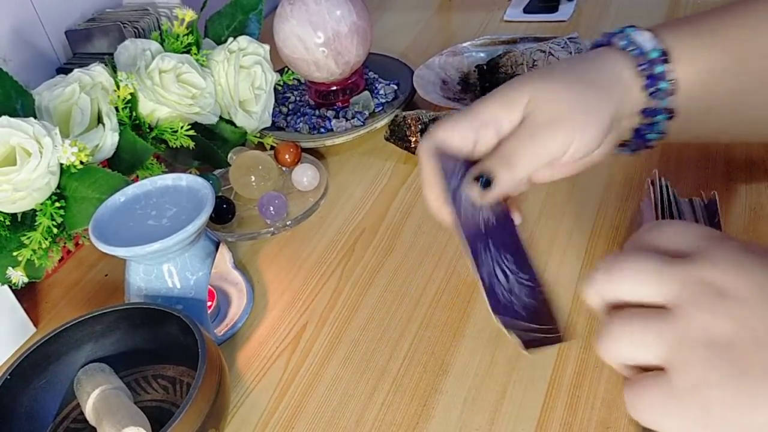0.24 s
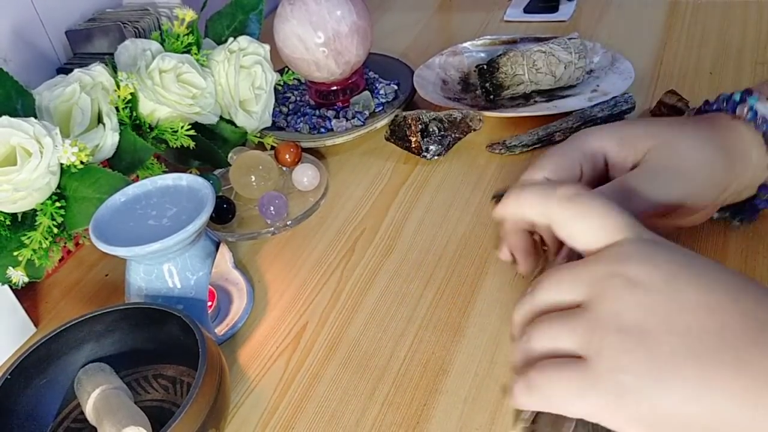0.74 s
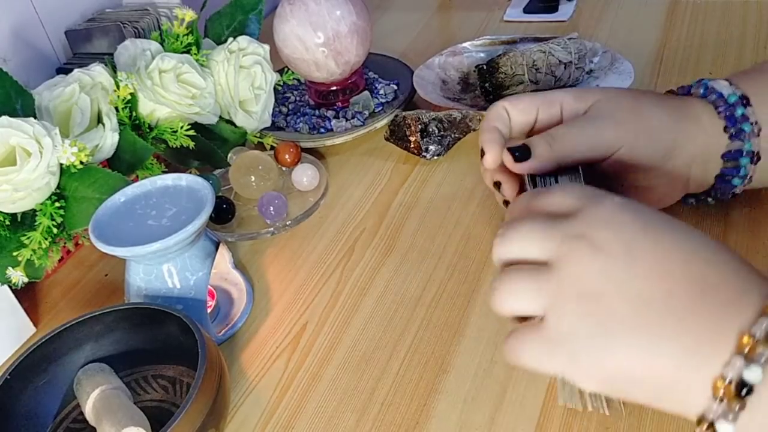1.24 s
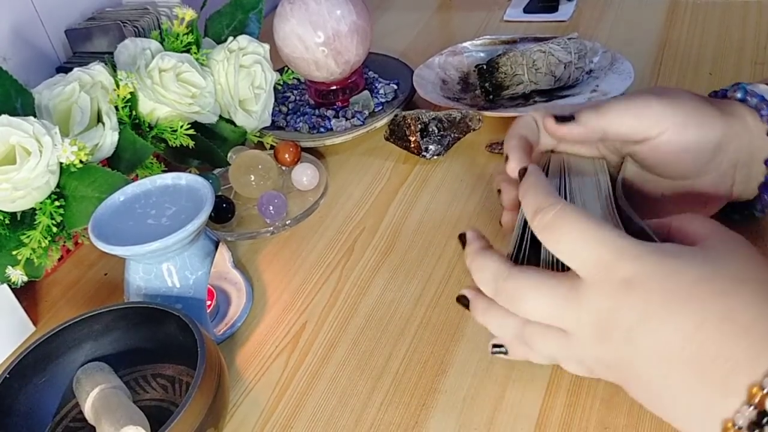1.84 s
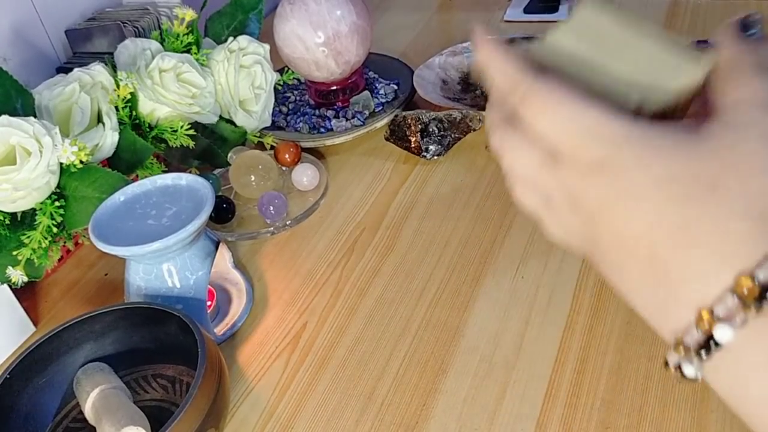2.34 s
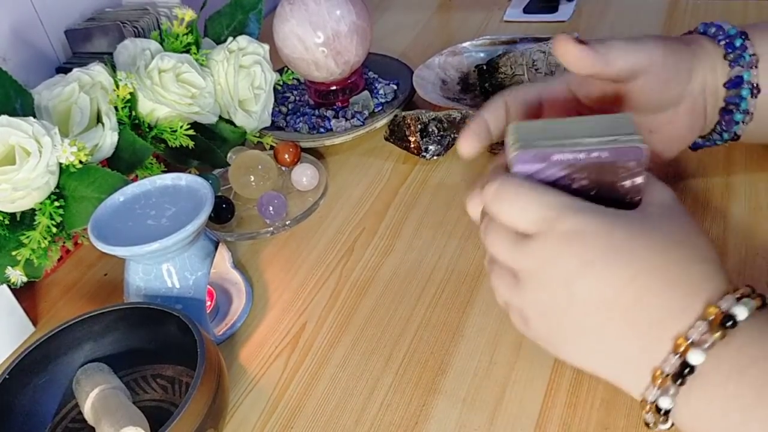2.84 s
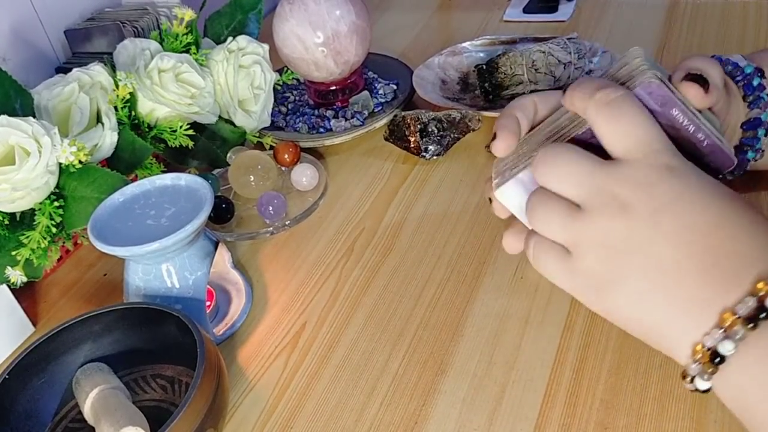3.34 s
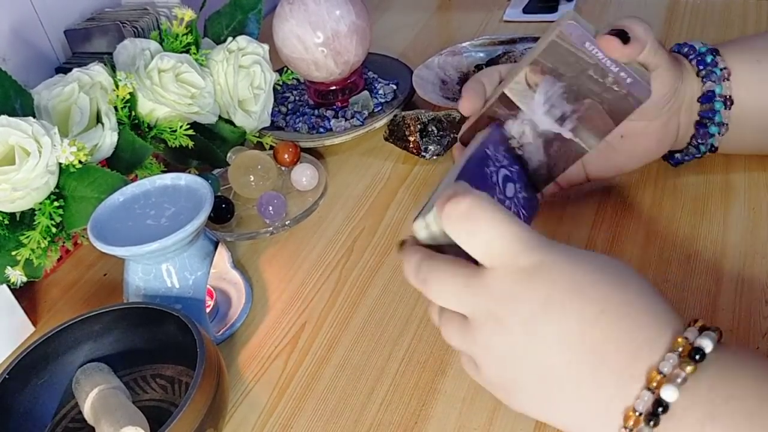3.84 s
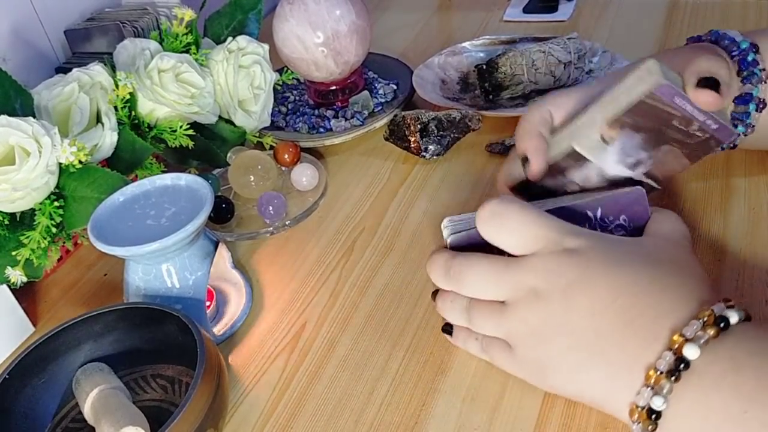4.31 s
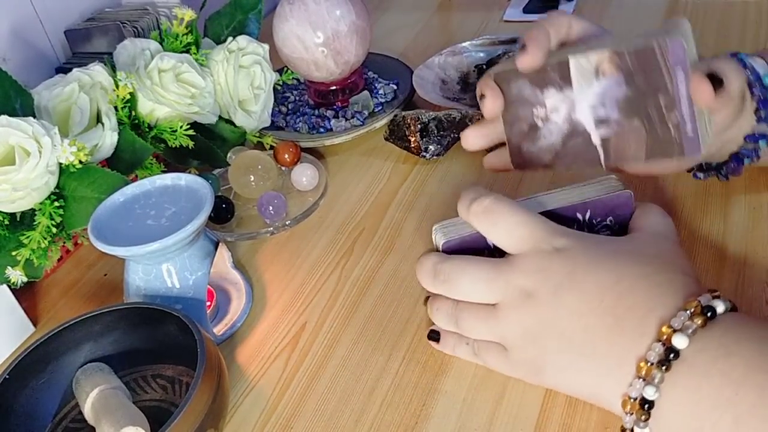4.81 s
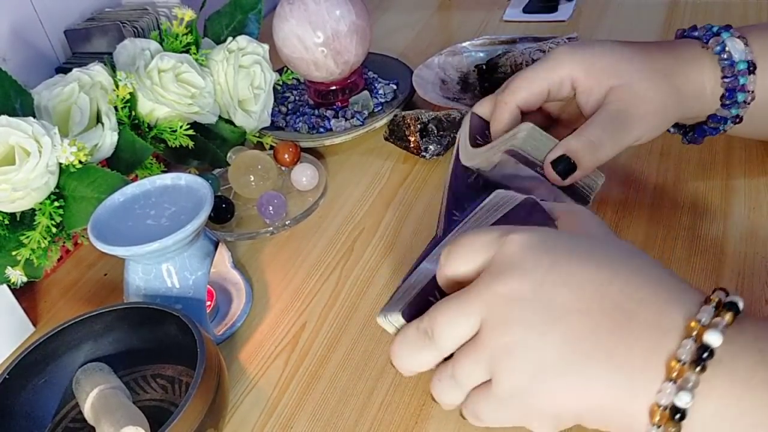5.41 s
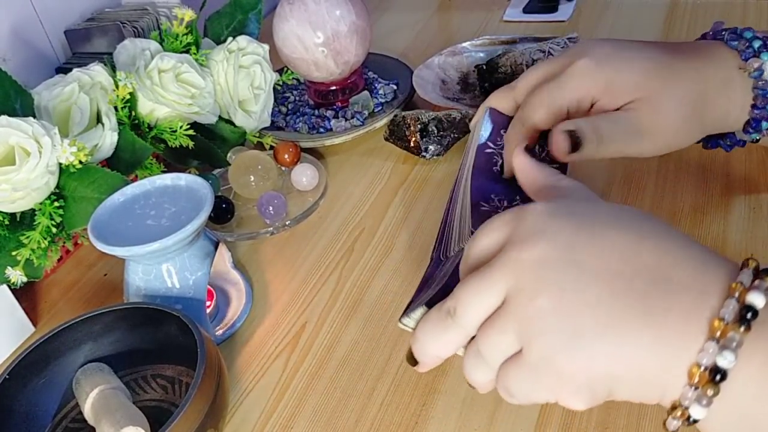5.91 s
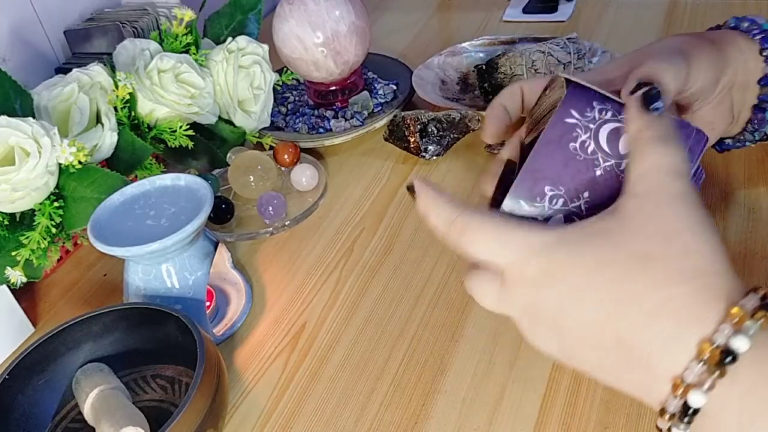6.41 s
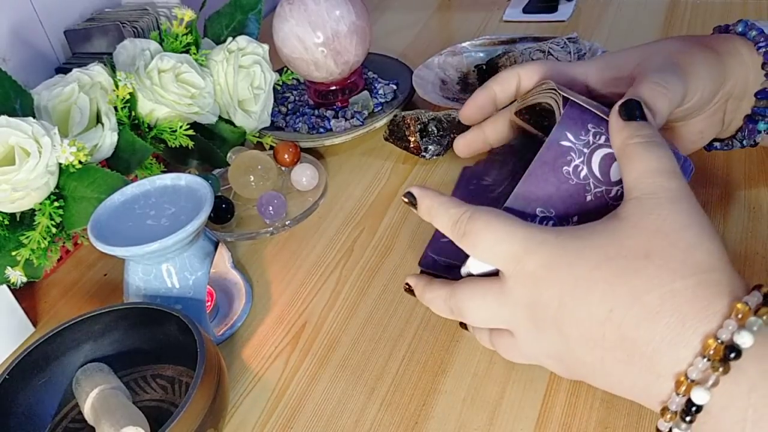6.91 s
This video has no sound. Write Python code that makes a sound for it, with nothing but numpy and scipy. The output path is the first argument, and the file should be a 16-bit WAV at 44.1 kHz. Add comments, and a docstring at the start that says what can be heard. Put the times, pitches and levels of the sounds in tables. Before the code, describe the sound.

Faint card rustles and ticks, sharp deck clacks on wood, then a swelling riffle of crisp snaps and a softer fluttering bridge, close in a small room.

```python
"""A fan's wavering hum and rush of air, then the faint rustle and first snaps of a deck of large cards.
The deck is knocked square on a wooden table, cut in two, riffled and bent into a bridge.
Knocks are clacks of card edges over table thuds; flicks are ringing edge snaps plus slaps on the pile.
Rubbing faces are uneven catches in noise. Short blurred tails follow the sounds; the band is narrow.
"""
import sys
import numpy as np
from scipy import signal
from scipy.fft import rfft, irfft, next_fast_len
from scipy.io import wavfile
from scipy.ndimage import uniform_filter1d

SR = 44100
rng = np.random.default_rng(int(sys.argv[2]) if len(sys.argv) > 2 else 0)


def wrap_up_sound(samples):
    """Save the sound to the file named by the first command line argument, as 16-bit audio."""
    columns = np.atleast_2d(samples).T
    # keep every value between -1 and 1, then stretch to whole-number steps
    tamed = np.clip(columns, -1, 1)
    steps = np.round(tamed * 32767).astype(np.int16)
    wavfile.write(sys.argv[1], SR, steps)


N = 315664  # samples


def undb(db):
    """Decibels to amplitude gain."""
    return 10 ** (np.asarray(db) / 20)


def curve(table):
    """Columns of a timed table, joined by straight lines, one value per sample."""
    s, *columns = np.transpose(table)
    t = np.arange(N) / SR
    return [np.interp(t, s, column) for column in columns]


def unit(x):
    """Scale to rms 1."""
    return x / np.sqrt(np.mean(x ** 2))


def walk(rate_hz):
    """Slow random drift of rms 1: random steps at rate_hz, smoothed twice."""
    step_len = int(SR / rate_hz)
    steps = np.repeat(rng.standard_normal(N // step_len + 1), step_len)
    smooth = uniform_filter1d(uniform_filter1d(steps, step_len), step_len)
    return unit(smooth[:N])


def colour(x, points, extra_db=lambda hz: 0):
    """Minimum-phase filter through (Hz, dB) points, plus an optional dB function of frequency."""
    size = next_fast_len(len(x), real=True) * 2
    hz = np.maximum(np.fft.rfftfreq(size, 1 / SR), 1)
    point_hz, point_db = np.transpose(points)
    gain_db = np.interp(np.log(hz), np.log(point_hz), point_db) + extra_db(hz)
    # folding the cepstrum makes the filter causal
    cepstrum = irfft(np.log(undb(gain_db)))
    cepstrum[1:size // 2] *= 2
    cepstrum[size // 2 + 1:] = 0
    response = np.exp(rfft(cepstrum))
    return irfft(rfft(x, size) * response)[:len(x)]


def contact(ms, points, extra_db=lambda hz: 0, first=0, size=2048):
    """A first touch and a dying chatter of tiny ones; energy of one millisecond at rms 1."""
    t_ms = np.arange(size) * 1000 / SR
    chatter = rng.standard_normal(size) * np.exp(-(t_ms / (1.29 * ms)) ** 2)
    chatter[0] += first * np.linalg.norm(chatter)
    # so many touches favour no pitch: flatten the spectrum, let the filter give the colour
    flat = irfft(np.exp(1j * np.angle(rfft(chatter))))
    burst = colour(flat * np.exp(-(t_ms / (2.5 * ms)) ** 2), points, extra_db)
    return burst / np.linalg.norm(burst) * np.sqrt(SR / 1000)


def add(track, s, sound):
    """Mix a sound in at s seconds."""
    i = int(s * SR)
    track[i:i + len(sound)] += sound[:N - i]


# Background level. Each row: time in seconds, level in dB before the gains.
BACKGROUND_LEVEL = [(0, -68), (1.0, -65.5), (1.9, -62.5), (2.4, -71.5), (3.15, -65), (3.5, -67.5),
                    (4.3, -65), (5.4, -69), (5.7, -58.5), (6.2, -65), (6.5, -67.5), (7.15, -56)]
# Spectrum of the moving air. Each row: frequency in Hz, relative level in dB.
AIR_SPECTRUM = [(20, -55), (40, -28.5), (53, -16.5), (90, -20), (118, -12), (160, -11), (205, -15),
                (250, -13), (330, -9), (365, -11.5), (420, -16), (720, -14.5), (1000, -21), (7800, -32)]
# Fan tones. Each row: mean frequency in Hz, level in dB rms before flutter, level curve and hum_db.
FAN_TONES = [(118.4, -73), (183.0, -81), (242.2, -76.5), (360.7, -68.5)]


def fan(air_gain_db=0.97, hum_db=1.0, waver_hz=1.6, flutter_db=1.8, hum_follow=0.56):
    """Wavering tones over coloured noise; both follow a level curve, which also carries the low swell of the
    hands pushing the cards in riffle and bridge."""
    air_db, = curve(BACKGROUND_LEVEL)
    air = unit(colour(rng.standard_normal(N), AIR_SPECTRUM)) * undb(air_db + air_gain_db)
    hum = np.zeros(N)
    for hz, db in FAN_TONES:
        level_db = db + flutter_db * walk(30)
        phase_turns = np.cumsum(hz + waver_hz * walk(16)) / SR
        hum += undb(level_db) * unit(np.sin(2 * np.pi * phase_turns))
    # the hum follows the level curve by hum_follow dB per dB
    return air + hum * undb(hum_db + hum_follow * (air_db - air_db.mean()))


def tail_envelope(t, t60_s, hold_s, steep_db_per_s, gap_s=0.0013):
    """Envelope of a blurred tail: quick build-up, short slow fade, then a steep fade; energy 1."""
    decay_db = -60 * t / t60_s - steep_db_per_s * np.maximum(t - hold_s, 0)
    fade = undb(decay_db) * (1 - np.exp(-(t / gap_s) ** 2))
    return fade / np.linalg.norm(fade)


# Low modes ringing in the tail. Each row: frequency in Hz, level in dB before modes_db.
RINGING_MODES = [(133, 8.5), (178, -5.5), (283, 10.5), (334, 10.5), (360, 13.5), (405, -11), (482, -3.5),
                 (533, 0), (592, -17), (635, 0.5), (700, -3)]


def blurred_tail(x, t60_s, hold_s, steep_db_per_s, gap_s, bass_db=-4, modes_db=-30, count=4):
    """A bright, short noise tail over a darker one that stays longer, with a few low modes ringing."""
    t = np.arange(SR // 3) / SR
    bright = tail_envelope(t, t60_s, hold_s, steep_db_per_s, gap_s)
    dark = tail_envelope(t, t60_s=.65, hold_s=.08, steep_db_per_s=128.5)
    # the sound passes at random from one noise pattern to another
    shares = np.array([walk(25) for _ in range(count)])
    shares /= np.linalg.norm(shares, axis=0)
    treble_points = [(300, -26), (1000, -0.5), (5000, -0.5), (7500, -0.5)]
    bass_points = [(700, bass_db), (1200, -4.0), (3000, -20.5)]
    out = np.zeros(N)
    for share in shares:
        treble = colour(rng.standard_normal(len(t)), treble_points)
        bass = colour(rng.standard_normal(len(t)), bass_points)
        out += signal.oaconvolve(x * share, treble * bright + bass * dark)[:N]
    modes = np.zeros(len(t))
    for hz, db in RINGING_MODES:
        modes += undb(db + modes_db) * np.sin(2 * np.pi * (hz * t + rng.random()))
    return out + signal.oaconvolve(x, modes * dark)[:N]


# Deck knocks on table and palm. Each row: start in seconds, grip, edge clack in dB, table thud in dB,
# landing spread in ms, direct sound in dB relative to what feeds the tail.
DECK_KNOCKS = [(1.72, "loose", -28.5, -47, 2.3, -8.5), (1.726, "loose", -27, -48, 2.4, -2.5),
               (1.736, "loose", -20.5, -32.5, 5.7, -16), (1.784, "loose", -20, -31.5, 5.6, -15),
               (1.789, "loose", -18, -33.5, 2.5, -3), (1.803, "loose", -22, -32.5, 6.4, 1.5),
               (2.0367, "flat", -41, -39, 1.7, -12), (2.041, "flat", -23.5, -33.5, 5.1, -10),
               (2.057, "flat", -28.5, -28.5, 3.3, -7.5), (2.821, "on end", -50, -27.5, 7, -12),
               (2.826, "on end", -27, -27, 6.5, -6), (2.833, "on end", -13, -22.5, 3.8, -12),
               (4.05, "cut", -52, -38, 3.4, -15), (4.077, "cut", -33, -32, 5.8, -7.5),
               (4.670, "half", -45.5, -34.5, 4.3, -6.5), (4.716, "half", -25.5, -19.5, 2.96, -6)]
# Clack spectrum by grip. Each row: frequency in Hz, relative level in dB before the tilt.
CLACK_SPECTRA = {"loose": [(410, -47), (700, -12.5), (838, -8.5), (944, -17), (1010, -17), (1600, -18),
                 (2920, -10), (3890, -3.5), (4520, -1), (5810, -9.5), (7600, -22), (9880, -44),
                 (16700, -120)], "flat": [(410, -46), (700, 1.5), (855, 1), (1010, -4.5), (1140, -7.5),
                 (1190, -14), (1420, -4), (1920, -17.5), (2340, -1.5), (2920, -11.5), (3030, -3),
                 (3970, -1.5), (4300, -4.5), (4800, -6), (7600, -22.5), (9880, -53), (16700, -120)],
                 "on end": [(410, -33), (700, -1.5), (1110, -18), (1480, -9), (1720, -17), (1980, -8),
                 (2140, -13), (2410, -3.5), (2640, -14), (2830, -6.5), (3890, 0.5), (5050, -3.5),
                 (5580, -10.5), (6610, -10.5), (7600, -19.5), (9880, -31), (16700, -120)],
                 "cut": [(410, -28), (700, 3.5), (1210, -11), (1680, -10), (1920, -25), (2210, -12),
                 (2800, -7), (3070, -11.5), (3780, -4), (4430, -13.5), (7600, -25), (9880, -56),
                 (16700, -120)], "half": [(530, -39), (900, -16), (1050, -11), (1460, -13), (1730, 2),
                 (1920, -1.5), (2870, -6), (3170, -1), (3460, -4.5), (3890, -1), (7600, -17), (9880, -44),
                 (16700, -120)]}
# Table thud spectrum. Each row: frequency in Hz, relative level in dB.
THUD_SPECTRUM = [(40, -34.5), (85, -6.5), (130, -6), (200, -3.5), (330, -3), (520, -0.5), (750, -11.5),
                 (1200, -21), (2500, -29.5), (6000, -81)]
# cards that land together clack brighter: dB per octave gained per halving of the spread
UNTILTED_SPREAD_MS, TILT_DB_PER_OCTAVE_PER_HALVING = 5.06, 3.0


def knocks():
    """Cards land a little apart, edges clack, table thuds; returns direct sound and tail feed."""
    near, sent = np.zeros(N), np.zeros(N)
    for s, grip, clack_db, thud_db, spread_ms, direct_db in DECK_KNOCKS:
        tilt = TILT_DB_PER_OCTAVE_PER_HALVING * np.log2(UNTILTED_SPREAD_MS / spread_ms)
        clack = contact(spread_ms, CLACK_SPECTRA[grip],
                        lambda hz: tilt * np.log2(np.maximum(hz, 800) / 4000))
        thud = contact(spread_ms, THUD_SPECTRUM, first=0.47)
        blow = undb(clack_db) * clack + undb(thud_db) * thud
        add(sent, s, blow)
        add(near, s, undb(direct_db) * blow)  # the direct share differs from knock to knock
    return near, sent


# Card faces sliding: two pushes, the riffle, two bends of the bridge.
# Each row: start in seconds, rise in seconds, hold in seconds, peak level in dB.
SLIDE_PUSHES = [(0.756, .165, .014, -54), (1.39, 0.075, .025, -64.5), (5.41, .47, .134, -31.5),
                (6.42, .14, .17, -60), (6.38, .77, 0.032, -49.5)]
# a push grows as a power of time; the sliding dies quickly once the cards are free
PUSH_POWER, RELEASE_DB_PER_S = 2.75, 1100


def sliding():
    """Level of the sliding in dB: each push builds up, holds and lets go."""
    t = np.arange(N) / SR
    gain = np.zeros(N)
    for start_s, rise_s, hold_s, db in SLIDE_PUSHES:
        rise = np.clip((t - start_s) / rise_s, 0, 1) ** PUSH_POWER
        free_s = np.maximum(t - start_s - rise_s - hold_s, 0)
        gain += undb(db - RELEASE_DB_PER_S * free_s) * rise
    return 20 * np.log10(gain + 1e-6)


# Spectrum of rubbing faces. Each row: frequency in Hz, relative level in dB.
RUB_SPECTRUM = [(50, -19.5), (150, 4), (400, 1.5), (750, -10.5), (1300, -9.5), (2200, -8), (3300, -2.5),
                (4600, -2.5), (6000, -7.5), (7500, -6.5)]
# faster sliding catches more often: rate at the slow level, and the dB that double it
SLOW_CATCHES_PER_S, SLOW_SLIDE_DB, DB_PER_DOUBLING = 330, -60, 21.5
HELD_DB = -10  # faint rustle under the pushes, relative to BACKGROUND_LEVEL


def rubbing(slide_db, scatter_db=0.5):
    """Sliding faces catch and slip in tiny, uneven steps: random clicks over a little noise."""
    db = np.maximum(slide_db, curve(BACKGROUND_LEVEL)[0] + HELD_DB)
    rate_per_s = SLOW_CATCHES_PER_S * 2 ** ((db - SLOW_SLIDE_DB) / DB_PER_DOUBLING)
    size = undb(scatter_db * np.minimum(rng.exponential(size=N), 4))
    caught = rng.random(N) < rate_per_s / SR
    # dividing by sqrt(rate) keeps the power even
    catches = caught * size * rng.choice([-1, 1], N) / np.sqrt(rate_per_s)
    friction = unit(catches) + .5 * rng.standard_normal(N)
    return unit(colour(friction, RUB_SPECTRUM)) * undb(db)


# lesser edges slip off from the riffle on through the bridge
FIRST_SLIP_S, LAST_SLIP_S = 5.48, 7.15
# snap level at 0 dB of sliding, its growth and its scatter
SLIP_DB, SLIP_GROWTH_DB_PER_DB, SLIP_SCATTER_DB = 14, 1.087, 2.5
EDGE_HZ, EDGE_SPREAD_OCTAVES = 4800, 0.18


def slips(slide_db, count=90):
    """Lesser edges slip off at uneven intervals, as loud as the sliding drives them; rows for flicks()."""
    gap, size, pitch = rng.standard_normal((count, 3)).T
    steps = np.cumsum(np.exp(.4 * gap))
    s = np.interp(steps / steps[-1], [0, 1], [FIRST_SLIP_S, LAST_SLIP_S])
    drive_db = np.interp(s, np.arange(N) / SR, slide_db)
    snap_db = SLIP_DB + SLIP_GROWTH_DB_PER_DB * drive_db + SLIP_SCATTER_DB * size
    edge_hz = EDGE_HZ * 2 ** (EDGE_SPREAD_OCTAVES * pitch)
    return np.transpose([s, snap_db, edge_hz])


def edge_colour(hz, edge_hz, snap_db, grip, width_octaves=0.68, ring_per_db=0.07, ring_width_hz=650):
    """Colour of one card edge in dB: a broad hump with a ringing top, between weaker bending modes."""
    hump = -10 * np.log10(1 + (np.log2(hz / edge_hz) / width_octaves) ** 2)
    # a light flick is mostly ring, a hard one mostly crack
    ring = -ring_per_db * snap_db * np.exp(-((hz - edge_hz) / ring_width_hz) ** 2)
    # the grip sets how far apart the other modes lie
    modes = 3 * np.cos(2 * np.pi * (hz - edge_hz) / (grip * 2100))
    return hump + ring + modes


# Clearest snaps of single card edges. Each row: start in seconds, snap level in dB, edge pitch in Hz.
CLEAR_FLICKS = [(0.4657, -57, 4360), (0.6746, -45, 4290), (0.8586, -41.5, 5300), (1.427, -52.5, 3960),
                (2.2254, -44.5, 5490), (4.0098, -45.5, 5570), (4.3864, -54, 5140), (5.4975, -43.5, 4820),
                (5.538, -40, 5570), (5.5725, -31, 4920), (5.5993, -30.5, 5660), (5.6208, -35.5, 4840),
                (5.6515, -28, 4960), (5.6786, -22.5, 5010), (5.7061, -20, 4300), (5.7375, -17, 6400),
                (5.7594, -10, 5060), (5.763, -14.5, 4970), (5.7757, -14.5, 5570), (5.798, -14, 4370),
                (5.8187, -9.5, 4150), (5.8386, -11.5, 5020), (5.856, -18.5, 5180), (5.8639, -15, 4660),
                (5.8755, -12.5, 5300), (5.9019, -8.5, 5150), (5.9063, -14, 5230), (5.9132, -11.5, 4800),
                (5.926, -12, 4520), (5.9468, -10, 4990), (5.9543, -16, 5580), (5.9621, -14.5, 4760),
                (5.98, -12, 5460), (6.505, -50, 5250), (6.571, -46.5, 4570), (6.593, -41.5, 4140),
                (6.6249, -37.5, 5570), (6.79, -38.5, 4760), (6.8944, -43, 4910), (6.9216, -43, 4800),
                (6.9456, -38, 4950), (7.0661, -36.5, 4860), (7.0759, -33, 4410), (7.101, -35.5, 4430),
                (7.1376, -32.5, 4400)]
# Snap spectrum before the edge colour. Each row: frequency in Hz, relative level in dB.
SNAP_SPECTRUM = [(400, -20), (1300, -17.5), (2100, -8.5), (3100, -2.5), (4400, -2), (6000, -4.5),
                 (7300, -4), (8500, 0.5)]
# Spectrum of a card slapping the pile. Each row: frequency in Hz, relative level in dB.
SLAP_SPECTRUM = [(40, -25), (120, -3), (220, -2), (350, 4.5), (680, 4), (1000, -7.5), (1500, -23),
                 (4000, -32)]
# a harder snap slaps harder: slap level at a 0 dB snap, its growth and its scatter
SLAP_DB, SLAP_GROWTH_DB_PER_DB, SLAP_SCATTER_DB = -15.5, 0.82, 2.5


def flicks(rows, snap_ms=1.67, slap_ms=2.5):
    """Each released edge rings briefly around its own pitch and slaps the pile below."""
    out = np.zeros(N)
    for s, snap_db, edge_hz in rows:
        grip = rng.uniform(0.52, 1.4)
        scatter_db = SLAP_SCATTER_DB * rng.standard_normal()
        slap_db = SLAP_DB + SLAP_GROWTH_DB_PER_DB * snap_db + scatter_db
        snap = contact(snap_ms, SNAP_SPECTRUM,
                       lambda hz: edge_colour(hz, edge_hz, snap_db, grip), first=0.26)
        slap = contact(slap_ms, SLAP_SPECTRUM, first=.9)
        add(out, s, undb(snap_db) * snap + undb(slap_db) * slap)
    return out


def scene():
    """The fan, knocks, rubbing and flicks, with their blurred tails."""
    background = fan()
    near, sent = knocks()
    knock_tail = undb(-0.34) * blurred_tail(sent, t60_s=1.0, hold_s=0.062, steep_db_per_s=223.5,
                                            gap_s=0.00087)
    slide_db = sliding()
    cards = rubbing(slide_db) + flicks(CLEAR_FLICKS) + flicks(slips(slide_db))
    # the cards' tail is weaker and shorter
    card_tail = undb(-5.5) * blurred_tail(cards, t60_s=0.27, hold_s=0.036, steep_db_per_s=249.5,
                                          gap_s=0.006, modes_db=-31.5)
    return (near + cards + knock_tail + card_tail + background)[None]


def record(dry):
    """The narrow-band microphone chain cuts steeply above 7.6 kHz."""
    lowpass = signal.cheby1(14, .2, 7600, fs=SR, output="sos")  # order, ripple in dB, edge in Hz
    return signal.sosfilt(lowpass, dry)


dry = scene()
out = record(dry)
wrap_up_sound(out)
```